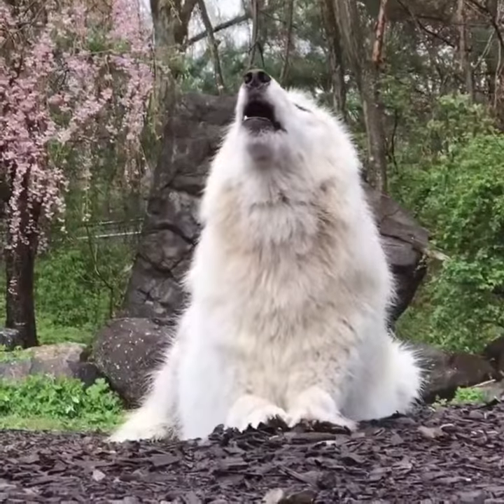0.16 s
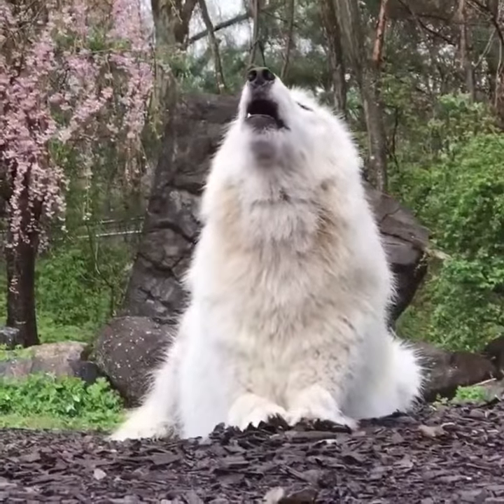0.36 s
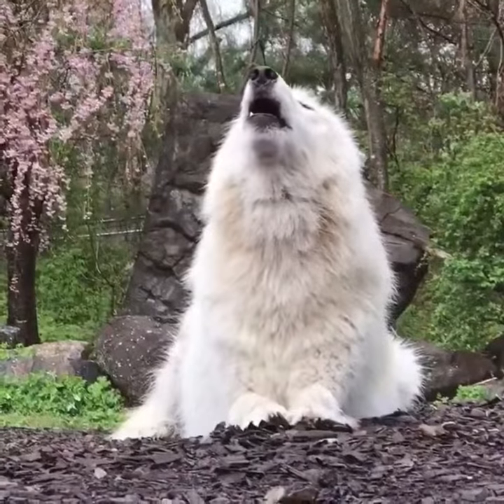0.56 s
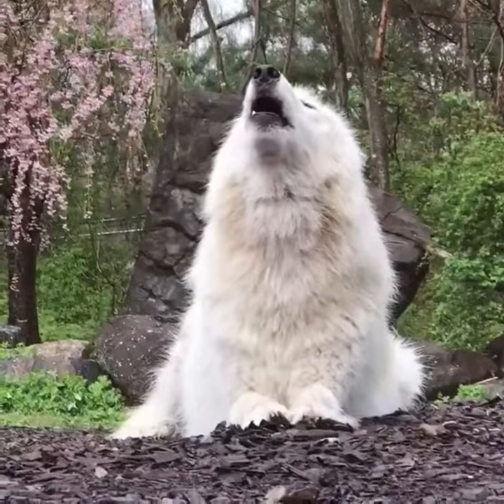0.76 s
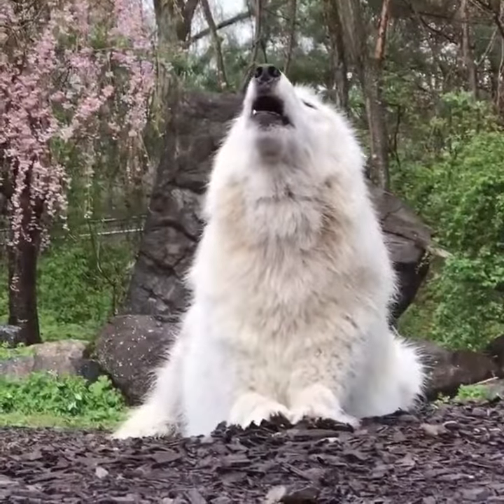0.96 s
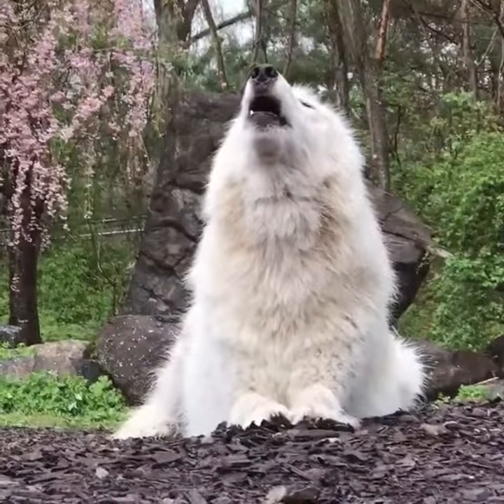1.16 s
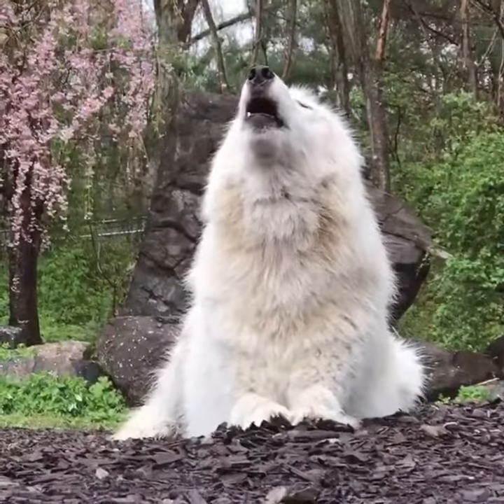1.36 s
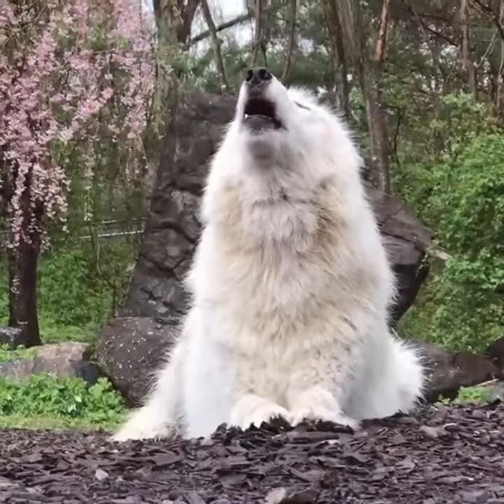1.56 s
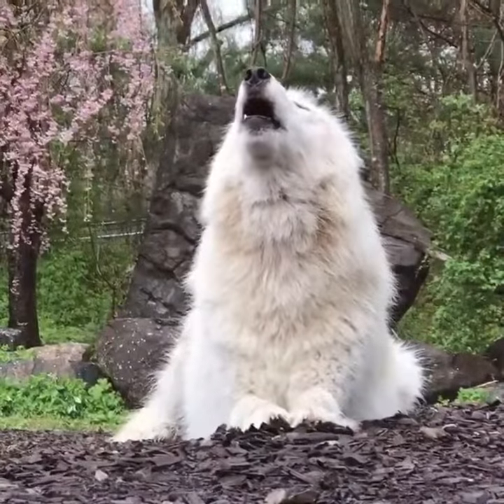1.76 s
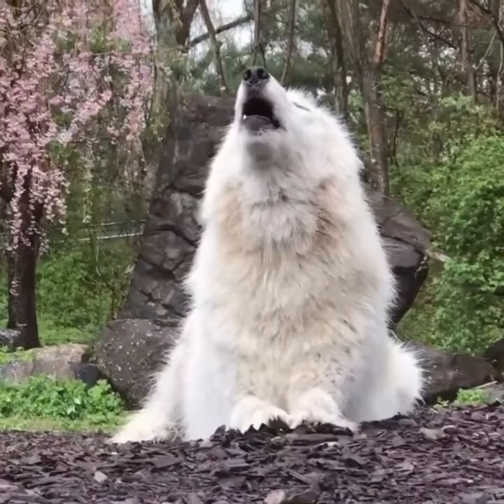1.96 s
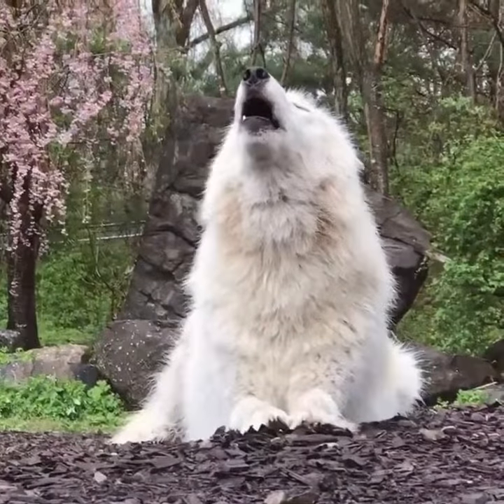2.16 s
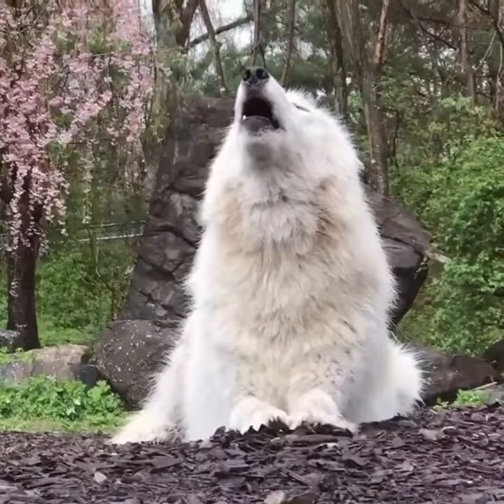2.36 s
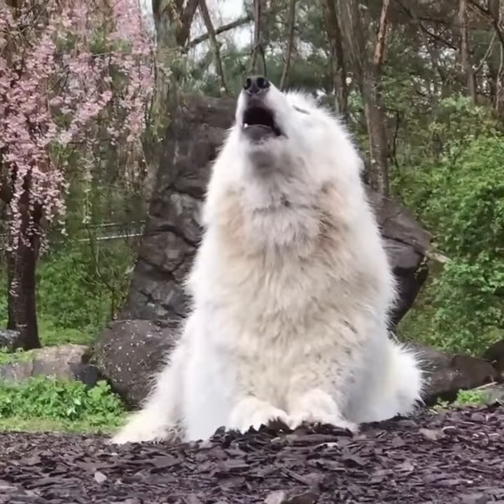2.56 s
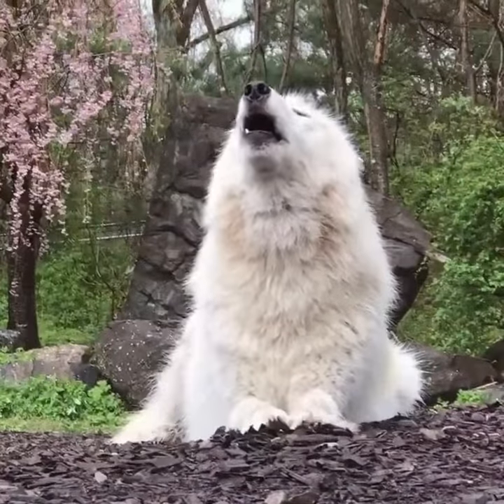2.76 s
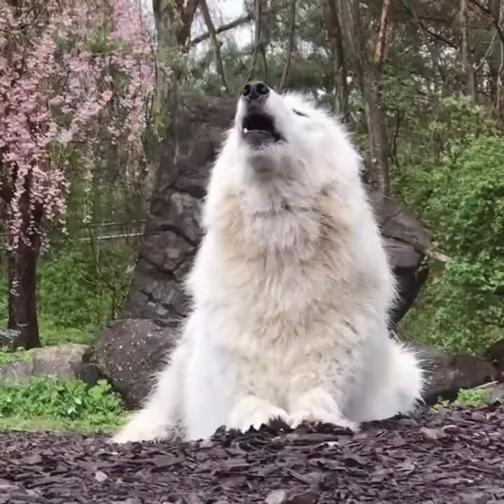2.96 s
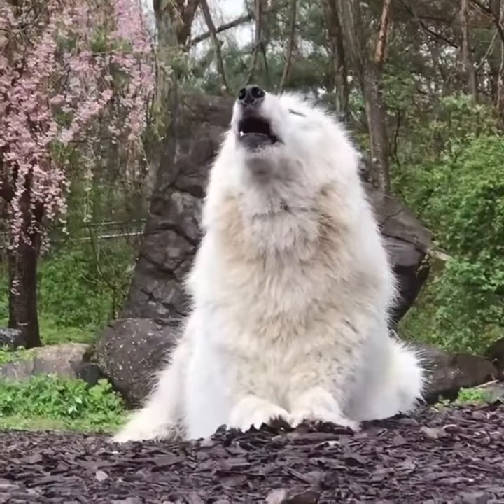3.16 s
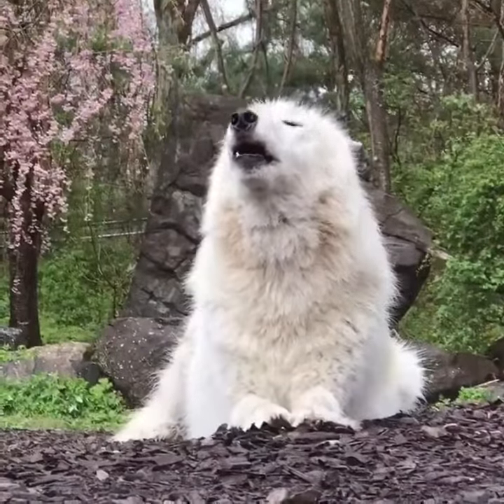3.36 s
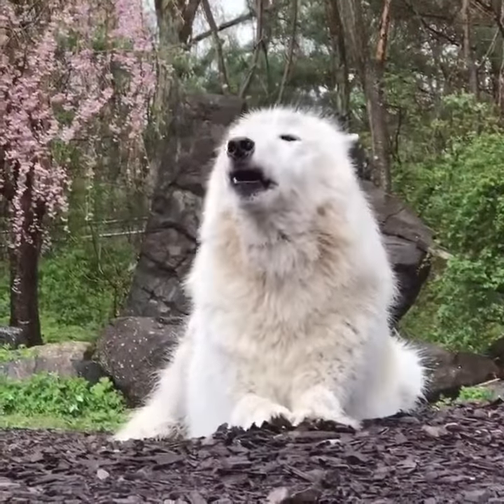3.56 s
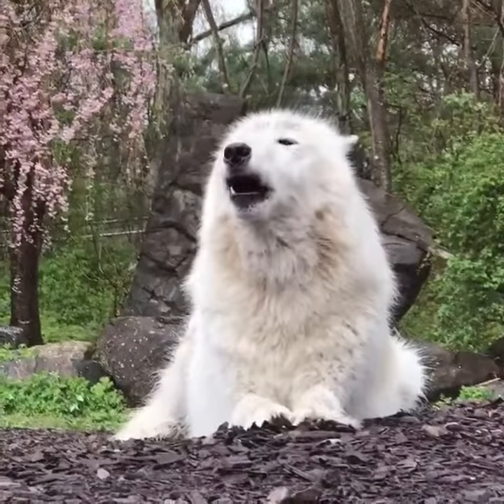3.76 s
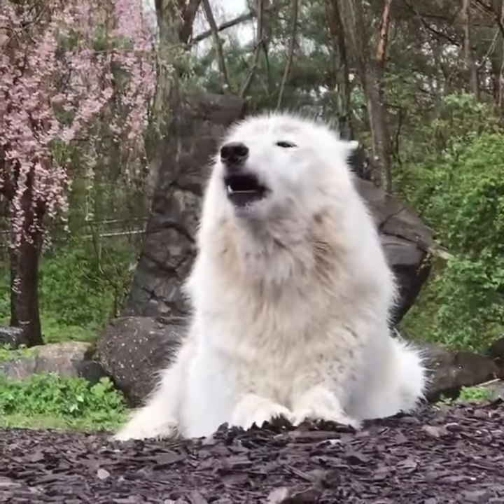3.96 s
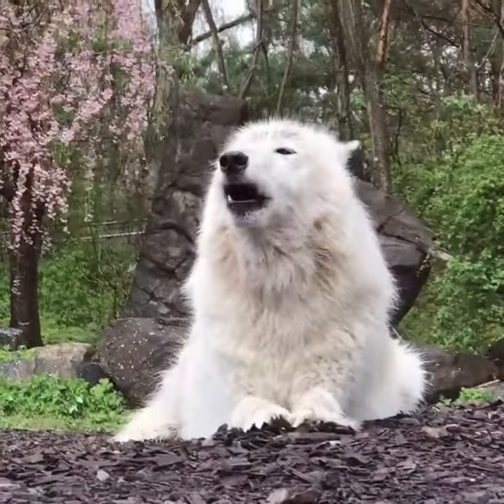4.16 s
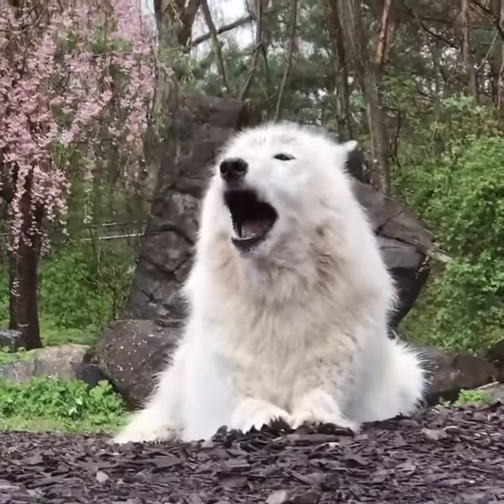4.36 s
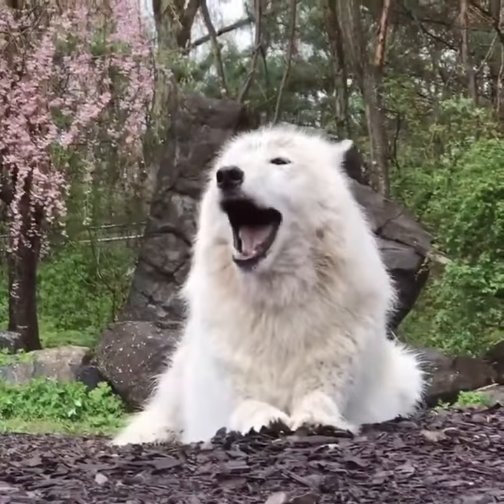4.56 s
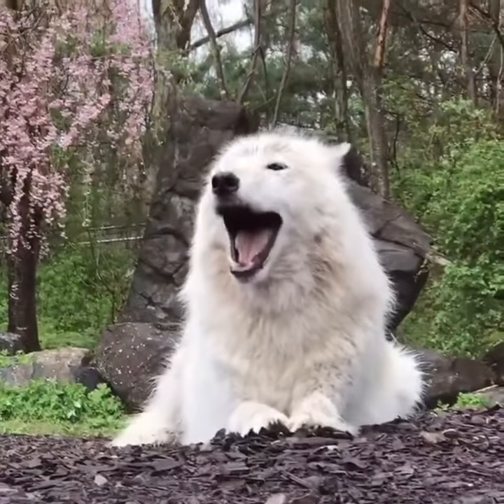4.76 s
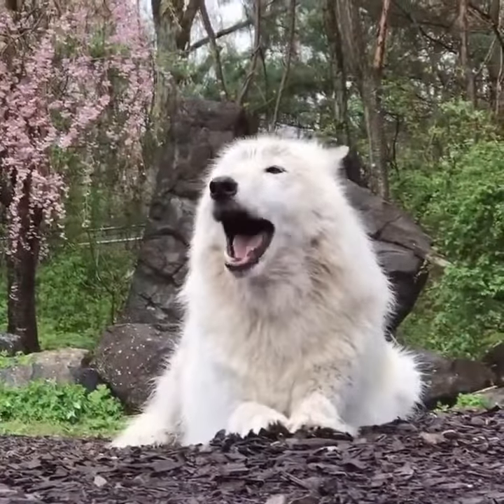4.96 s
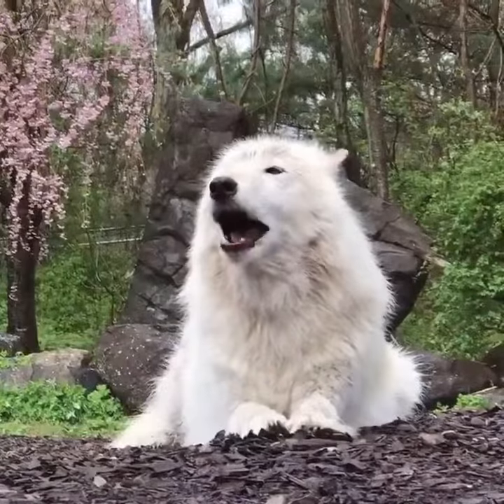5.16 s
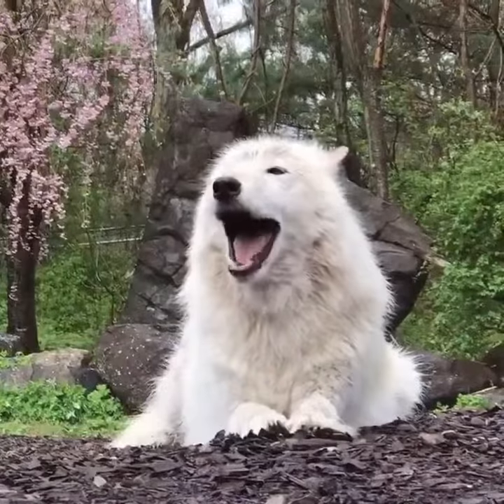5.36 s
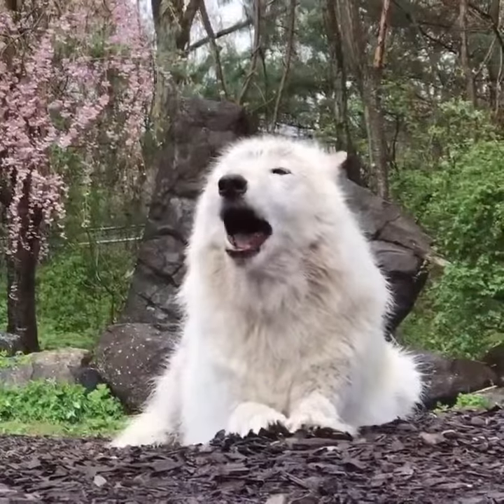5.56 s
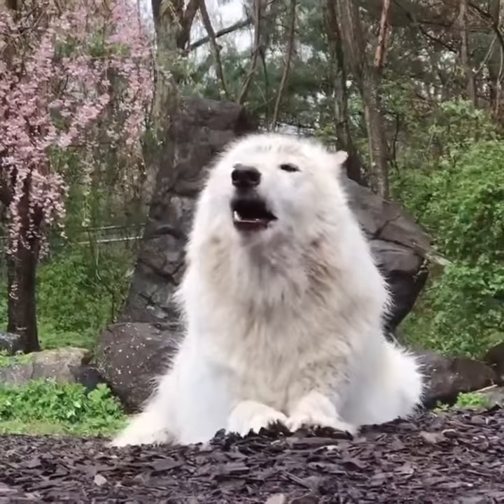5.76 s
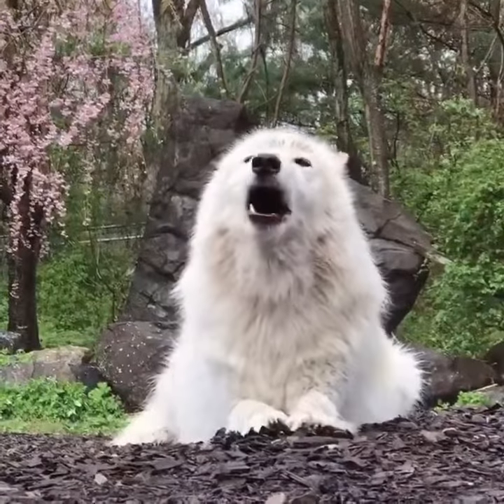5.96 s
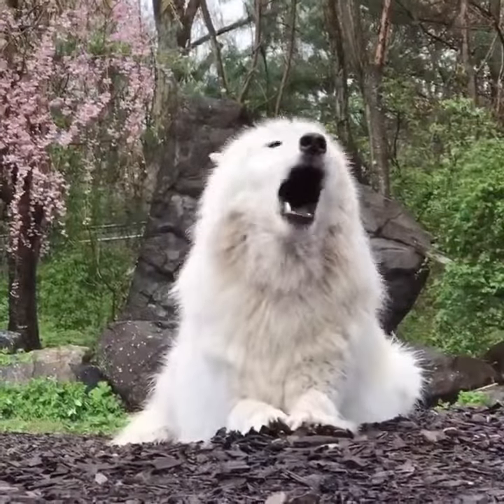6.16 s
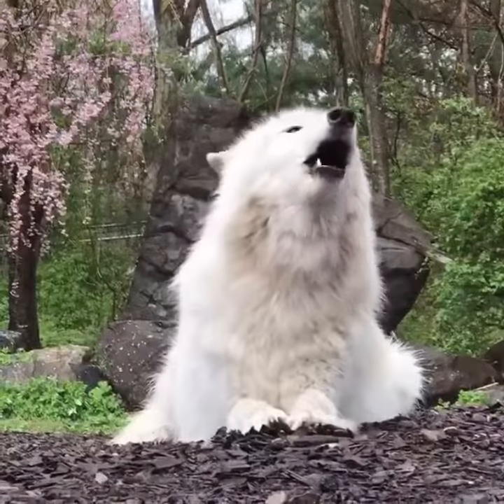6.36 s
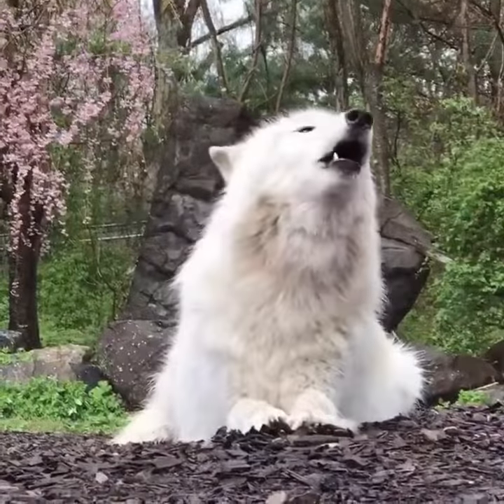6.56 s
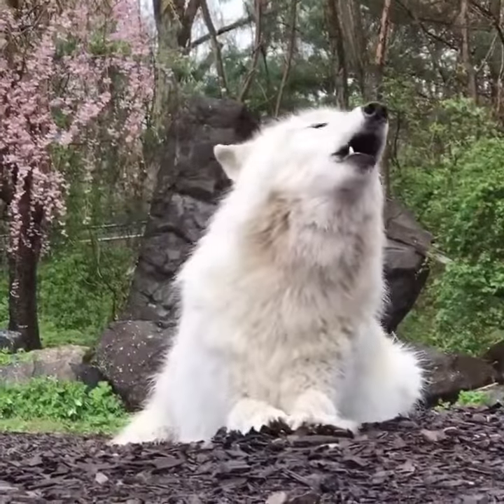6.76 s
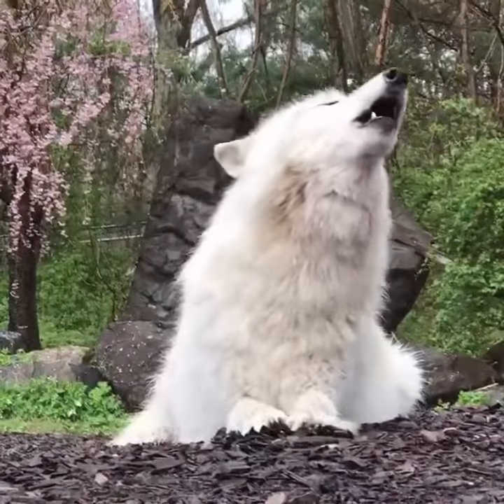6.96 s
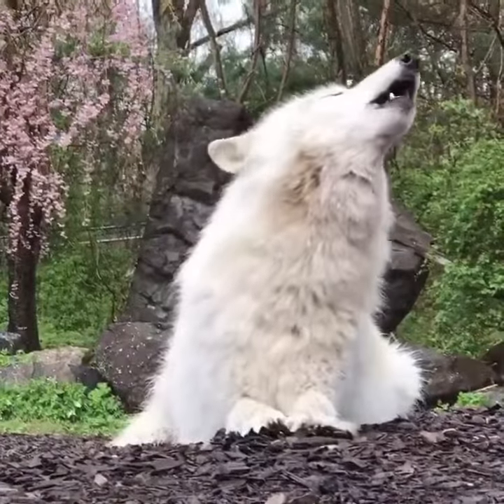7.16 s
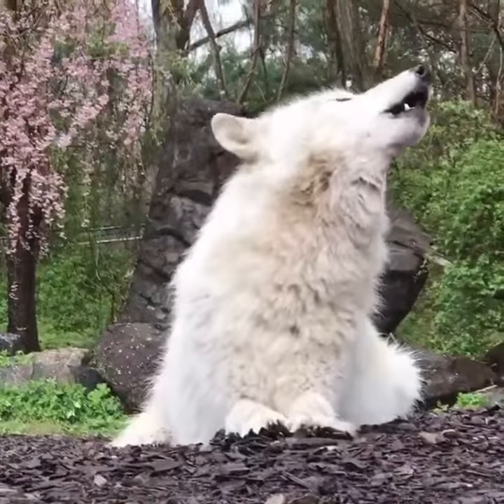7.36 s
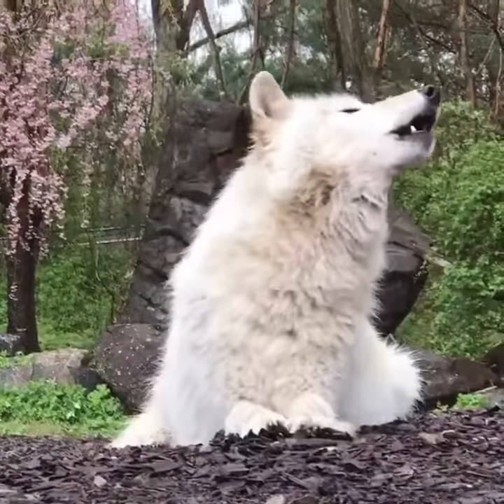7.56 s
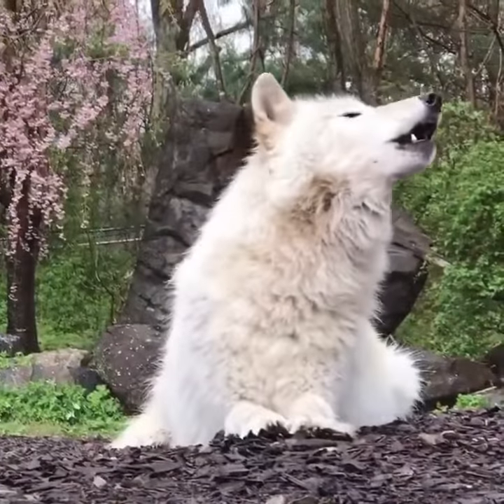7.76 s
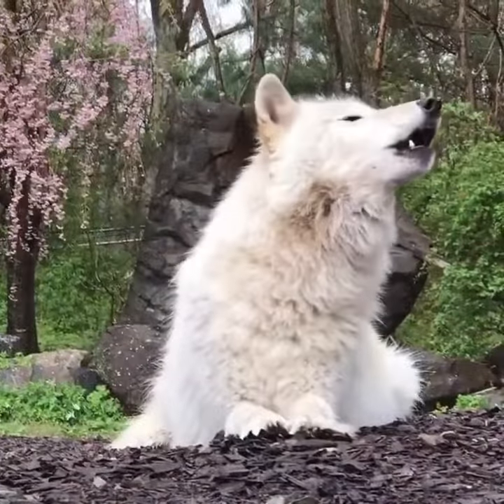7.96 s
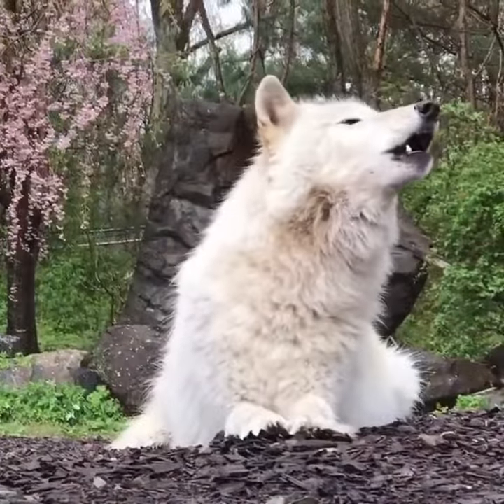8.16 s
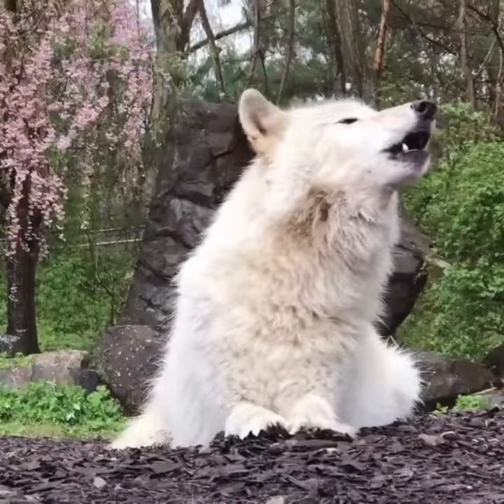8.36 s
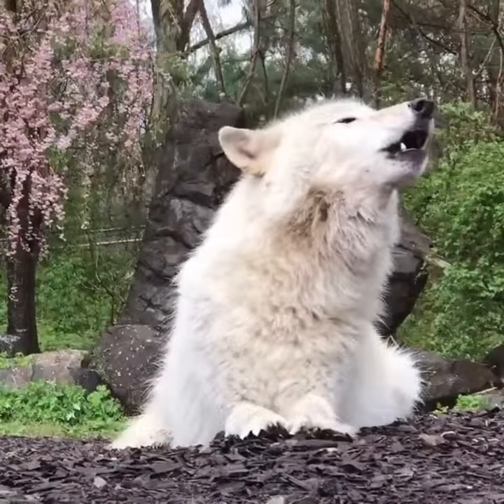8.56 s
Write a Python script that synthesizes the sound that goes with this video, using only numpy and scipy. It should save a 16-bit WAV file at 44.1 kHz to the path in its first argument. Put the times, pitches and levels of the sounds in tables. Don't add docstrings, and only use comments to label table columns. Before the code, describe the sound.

Close to a small microphone in quiet woods, a wolf holds a long mid-pitched howl while a packmate holds a higher, purer note. The near voice sags, cracks into a brief yodel, pauses, then whines and wails as the mate slides downward. A rough growl snaps into a bark, and after a short gap it scoops up to a softer, steady high howl with faint distant calls.

```python
import sys
import numpy as np
from scipy import signal
from scipy.fft import rfft, irfft, next_fast_len
from scipy.io import wavfile
from scipy.ndimage import uniform_filter1d, minimum_filter1d, map_coordinates

SR = 44100
rng = np.random.default_rng(int(sys.argv[2]) if len(sys.argv) > 2 else 0)


def log_audio(samples):
    frames = np.atleast_2d(samples).T
    limited = np.clip(frames, -1, 1)
    pcm = np.round(limited * 32767).astype(np.int16)
    wavfile.write(sys.argv[1], SR, pcm)


def amplitude_ratio(level_db):
    exponent = np.asarray(level_db, float) / 20
    return 10 ** exponent


N = 379260

# pitch_hz, level_db
HUSH_COLOUR = [(25, -28.5), (50, -26.5), (80, -6), (125, 2), (300, -7), (700, 5), (1500, -14.5),
               (2400, -23), (2900, -31), (6000, -35.5), (11500, -40.5)]
# start_s, level_db
HUSH_LEVEL = [(0, -57.5), (2.5, -59.5), (3, -55), (4, -59.5), (4.4, -56), (6.2, -56.5), (6.6, -64),
              (7.7, -62.5), (8.6, -58.5)]
# pitch_hz, t60_s
TREE_DECAY = [(200, 1.2), (1000, 1.5), (1800, 1.6), (3500, 0.3)]

# start_s,
# pitch_hz, level_db
MATE_NOTE = [(0.0, 699, -13.5), (1.0, 699.6, -14.5), (1.5, 687, -14), (2.18, 674.2, -13.5),
             (3.24, 678, -12.5), (3.8, 671.6, -14),
             (3.94, 651.7, -21), (4.061, 609.6, -22.5), (4.2, 590, -22.5), (4.32, 544.7, -23),
             (4.62, 535, -22.5), (4.819, 491.3, -28.5), (4.96, 464.4, -28.5), (5.12, 459, -30),
             (5.3, 462.9, -32),
             (5.38, 447, -25.5), (5.44, 425.1, -27), (5.5, 409.5, -27.5), (5.6, 365.8, -20.5),
            (5.78, 355.7, -26.5), (6.06, 358, -21.5), (6.14, 354.2, -23), (6.18, 339.2, -30),
            (6.21, 331, -29)]
MATE_END = [(6.54, 339, -50.5), (6.74, 323.5, -48.5), (6.9, 312, -54), (6.99, 300, -53.5)]
# start_s, pitch_hz, level_db
FAR_CALLS = [
    [(4.2, 470.8, -32.5), (4.3, 462, -42.5), (4.42, 436, -33.5), (4.62, 416.5, -28.5), (4.8, 404, -29.5),
     (5.3, 394, -38), (5.75, 399.8, -37), (5.96, 397, -30.5), (6.21, 382, -35)],
    [(7.2, 658, -62.5), (7.58, 648, -61.5), (7.98, 645, -58), (8.36, 651, -52), (8.6, 628.5, -61.5)],
    [(8.15, 507, -63.5), (8.22, 486, -50), (8.3, 426, -48.5), (8.42, 417, -59.5)],
    [(.36, 569, -47.5), (.54, 545, -48)],
    [(1.18, 578, -49.5), (1.4, 582, -46.5), (1.58, 593, -47)],
    [(1.95, 521, -44.5), (2.22, 574, -45.5)],
    [(.1, 219.6, -58.5), (1.6, 224.6, -64), (3.4, 204.3, -59)],
]
FAR_SECOND_DB = [4.5, 37, -5, -10.5, -11.5, -7.5, -16]
# partial_hz, level_db
OVERTONE = [(620, -13.5), (720, -18.5), (830, -24), (890, -33), (940, -16.5), (1090, -11), (1330, -28.5),
            (1400, -37.5)]

# middle_s, length_s, pitch_hz, level_db
SQUEAKS = [
    (4.393, 0.074, 2000, -61.5),
    (4.37, .04, 9300, -72),
    (6.1, .03, 2350, -57.5),
    (7.6, .03, 6200, -60),
    (5.753, 0.024, 2700, -52),
    (5.772, 0.037, 2460, -44),
    (6.219, .034, 501.6, -15.5),
    (6.227, .024, 1310, -23),
]
# start_s, level_db
PUFFS = [
    (6.222, -37.5),
    (6.365, -39.5),
    (6.995, -35.5),
]
# start_s, slap_rate_hz, level_db
GROWLS = [
    [(6.207, 491, -25.5), (6.222, 476.5, -14.5), (6.24, 378.4, -11), (6.3, 309, -10), (6.375, 350.3, -11),
     (6.405, 369, -24.5)],
    [(3.928, 431, -24), (3.942, 419.3, -21), (3.955, 419.4, -24)],
    [(5.715, 456, -25), (5.735, 402.3, -25), (5.765, 326, -40.5)],
    [(7.088, 458.4, -25.5), (7.098, 458, -16), (7.11, 447, -29.5), (7.2, 590, -52)],
]
# pitch_hz, width_hz, level_db
JAW = [(325, 150, -8), (535, 58, 4.5), (845, 59, -1), (1290, 270, -4.5), (1480, 260, -6.5),
       (1940, 180, -20.5)]
# pitch_hz, level_db
RASP = [(2500, -40), (2850, -31), (3300, 0.5), (3900, -14.5), (4400, -12), (5200, -5), (5900, -13),
        (6500, -10.5), (8000, -17), (11800, -30), (12300, -80)]
STUTTER_HZ, STUTTER_DB = 84.5, 3

# start_s, pitch_hz, effort_db, tilt_db_per_octave, mouth_wider_percent
LONG_NOTE = [(0.0, 408.6, -10.5, -9.5, 3), (0.22, 397.1, -10.5, -10, 0.66), (0.46, 389.6, -13.5, -9.5, -0.6),
             (1.02, 393.1, -11.5, -9.5, -0.5), (1.08, 403, -11.5, -8, 0.5), (1.52, 393.1, -12, -9.5, 0),
             (1.64, 403.4, -13, -7, 0.9), (1.73, 397.5, -12.5, -8.5, 1), (1.86, 403.8, -14, -8.5, -1.5),
             (2.149, 407.1, -12.5, -9, -0.9), (2.47, 411, -12.5, -9, 1), (2.72, 396.9, -12, -9, 0.5),
       (2.82, 386.7, -14.5, -9, 0.7), (3.239, 381.2, -14.5, -6.5, 1.5), (3.42, 375.8, -14.5, -6, 4),
       (3.498, 364.7, -16, -4, 0.4), (3.7, 349.6, -17.5, -5.5, -1.5), (3.8, 371.3, -15.5, -5.5, 5),
             (3.88, 360, -15.5, -7, 2.5), (3.901, 386.8, -13.5, -5.5, 9.5), (3.92, 414.6, -13, -5.5, 3.5),
        (3.935, 412.4, -18.5, -6.5, -8.5), (3.948, 417, -32, 2.5, -2)]
YODEL = [(3.936, 600.4, -33, -23.5, -10.5), (3.958, 713.7, -17.5, -31, -4.5), (3.97, 693, -29, -26, -1),
         (3.982, 566, -26, -26.5, -10), (4.0, 455.5, -16, -19.5, -10.5), (4.03, 431, -15.5, -22.5, -7.5),
         (4.08, 414.2, -25.5, -19, -9.5), (4.1, 412, -25, -30, -10), (4.13, 381, -63.5, -16.5, -10.5)]
WHINE_TO_WAIL = [(4.458, 407.5, -22.5, -21, -14.5), (4.5, 418.9, -11.5, -17, -12.5),
                 (4.56, 410.1, -13, -14.5, -15.5), (4.635, 523.1, -12.5, -13.5, -0.5), (4.72, 501, -9.5, -15, -0.5),
                 (4.76, 524.7, -10, -14.5, 2.5), (4.81, 514.8, -22.5, -9, -4.5), (4.86, 580, -17, -11, 7),
                 (4.94, 523.4, -22.5, -7.5, -3),
                 (4.991, 519, -22, -8, -3.5), (5.1, 542.8, -21, -7.5, 0), (5.15, 583.7, -17, -10.5, 7.5),
        (5.34, 533.5, -2.5, -18.5, 1.55), (5.51, 558, -20.5, -8, 3.5), (5.55, 538.8, -18, -10.5, 0.9),
        (5.63, 431.6, -10, -14, -12.5), (5.71, 460.7, -10.5, -15.0, -8.5), (5.762, 530, -40.5, -15, 5)]
BARK = [(6.23, 357.8, -28, -24, -0.5), (6.31, 297.2, -25.5, -23, -4), (6.36, 323, -26, -5, -0.2),
        (6.39, 380.7, -27, -2, -5.5), (6.42, 420, -24.5, 0.5, -5), (6.45, 431, -24, -0.5, -3),
        (6.49, 410.3, -22, -2, -3.5), (6.515, 403.2, -25, -4.5, -5), (6.545, 393, -50, -18.5, 0)]
SCOOP = [(6.984, 306.3, -29, -15, -11.5), (7.0, 309.2, -22, -19.5, 0.5), (7.011, 368.4, -15, -20.5, 19.5),
         (7.02, 381, -14, -24, -9), (7.06, 400.8, -13.5, -24.5, 7.5), (7.088, 426, -15, -22.5, 21.5),
         (7.105, 428, -22, -22, 15)]
HIGH = [(7.096, 588.8, -43, -15.5, 1), (7.125, 643.6, -42.5, -18, 1), (7.155, 663.7, -45.5, -18.5, -3.5),
        (7.2, 678.6, -45.5, -19.5, -10), (7.315, 688.2, -47.5, -14.5, -8.5),
        (7.465, 676.3, -46.5, -15.5, -10.5), (7.865, 691.5, -48, -18, 3), (8.355, 704.4, -47.5, -11.5, 3.5),
        (8.6, 695.4, -48, -9.5, 0.8)]
# pitch_hz, half_width_hz, level_db
HELD_MOUTH = [(727, 31, 2.5), (1094.5, 48, -20.5), (1240, 220, 8), (1567, 42, 11), (1619.7, 38.5, -30),
              (1869.5, 87.5, -38), (2190, 18, -33)]
YODEL_MOUTH = [(914, 23, 18.8), (1334, 233, 30.7), (1870, 140, 32.4), (2415.0, 200, 23)]
WHINE_MOUTH = [(500, 22.4, -18), (986.4, 19.5, 9.5), (1094.1, 20, 18.5), (1576, 180, 19.5),
               (2120, 57, 10.5), (2395, 50, 13.5), (2660, 60, -14)]
BARK_MOUTH = [(830, 110, 15), (1378, 32.0, 15.5), (1705, 58, 10), (2170, 56, -43.5)]
SCOOP_MOUTH = [(630, 90.7, 21.8), (805, 16, 4.1), (1190, 180, 31.2), (1630, 89, 20.2)]
HIGH_MOUTH = [(764, 356, 35.46), (1360, 246, 27.25), (2060, 35, 14), (2460, 150, 24.9)]
# pitch_hz, level_db
SHUT = [(1500, -44), (2180, 6.5), (2340, -25), (2460, -1.5), (3000, -32.5), (4400, -12), (4800, -24),
        (6000, -6.5), (6500, -7.5), (7400, -32.5), (8400, -21.5), (9000, -28.5), (11800, -42),
        (12300, -92.5)]
OPEN = [(1500, -93), (2300, -1.5), (3600, -2.5), (4700, -20), (5600, -16), (6600, -14.5), (8200, -36),
        (9400, -17), (10200, -40), (11000, -28.5), (11800, -38.5), (12300, -92)]
NARROW = [(1500, -87), (2400, -0.5), (3200, -14), (4100, -11.5), (4800, -16), (5500, -7), (6100, -25.5),
          (7100, -9), (8000, -30), (9300, -24.5), (11600, -41), (12300, -89.5)]
GAPE = [(1500, -60), (2400, -3), (2750, -22), (3200, 0), (3800, -16), (4400, -14), (5050, 0), (5600, -14),
        (6300, -6), (7400, -10), (8400, -22), (9600, -12), (11600, -35), (12300, -90)]
SNAP = [(1500, -60), (2500, -6), (2950, 0), (3400, -2), (3800, -20), (4250, 0), (4650, -8), (5000, -1),
        (5500, -16), (6000, -4), (7000, -12), (9300, -20), (11600, -40), (12300, -90)]
# start_s, pitch_hz, lift_db
PALATE = [(0, 4300, 5.5), (1.0, 4240, 5.5), (1.65, 4190, 5), (2.0, 4410, 5.5), (2.7, 4370, 5.5),
          (3.1, 4200, -2), (3.5, 3730, 10.5), (3.62, 3920, 14), (3.85, 4020, 13), (3.96, 3370, 7),
          (4.06, 3200, 7.5), (4.5, 3360, 6.5), (4.72, 3576, 12), (4.95, 3610, 9), (5.2, 3390, 8.5),
          (5.5, 3360, 8.5), (5.64, 3440, 9.5), (6.4, 3260, 4.5), (6.48, 4240, 15), (7.04, 3700, 5.5),
          (7.15, 4010, 9.5), (7.6, 4100, 6.5), (8.6, 4180, 1.5)]
THROAT = [(0, 5330, 5.8), (.7, 5500, 6), (1.2, 5200, 6), (1.7, 5580, 6), (2.2, 5260, 8), (2.7, 5200, 2.7),
          (3.4, 5060, 3.9), (3.62, 5720, 8.9), (3.85, 5500, 3.6), (3.98, 5050, 10), (4.08, 5100, 5),
          (4.5, 5400, 7), (4.76, 5150, 6), (5.05, 6000, 8), (5.2, 5690, 10), (5.36, 5340, 10),
          (5.52, 5540, 7.2), (6.4, 5120, 4.5), (6.49, 4950, 8), (7.05, 5250, 8.1), (7.14, 5310, 11),
          (7.6, 5420, 8), (8.1, 5520, 5), (8.6, 4900, 4)]
NOSE = [(0, 6200, 8), (.6, 6250, 4.5), (1.1, 5990, 8.5), (1.45, 6220, 5.5), (1.9, 6000, 9.5),
        (2.4, 6190, 1.5), (2.72, 6140, 10), (2.85, 6200, 14), (3.3, 5990, 17.5), (3.5, 6270, 10.5),
        (3.77, 6540, 5), (4.03, 6250, 2.5), (4.5, 6500, 2), (4.72, 6600, 3.5), (4.95, 6280, 5),
        (5.3, 6550, 5), (5.55, 6600, 8.5), (6.45, 5970, 5.5), (7.04, 6400, 6.5), (7.5, 6730, -1.5),
        (8.0, 7070, 2), (8.4, 6760, 8.5), (8.6, 6700, 11)]
SINUS = [(0, 8730, 0.5), (.6, 8700, 10), (1.0, 8570, 2), (2.7, 8660, 0.5), (2.9, 8500, 11.5),
         (3.4, 8270, 14), (3.55, 8330, 5), (3.9, 8510, 3.5), (4.1, 8506, 1), (8.6, 8520, 0.5)]
# start_s, pitch_hz, lift_db
HOLLOW = [(0, 4850, -5), (1.9, 4900, -9), (2.6, 4800, -4), (3.1, 7100, -12), (3.45, 7300, -12),
          (3.9, 6200, -8), (4.05, 4000, -6), (4.6, 4500, -14), (4.95, 5300, -9), (5.2, 4300, -6),
          (5.36, 3900, -10), (5.65, 4400, -6), (6.46, 3800, -10), (7.05, 4500, -10), (7.5, 6300, -8),
          (8.6, 7800, -10)]
WANDER_WIDTH_HZ = 110
PURSE_S, PURSE_WIDTH_S = 5.36, 0.16
TURN_S, TURN_WIDTH_S, TURN_DB = 3.5, 0.56, -13.5

# start_s, level_db
TICKS = [(0.2214, -59.5), (0.2309, -52.5), (0.2738, -54), (0.3885, -60.5), (0.5212, -52), (0.5442, -55.5),
         (0.6774, -56), (0.7262, -55.5), (0.8131, -58), (0.8744, -51.5), (0.8894, -62.5), (0.9228, -52.5),
         (0.9712, -50), (1.0625, -56.5), (1.1794, -58), (1.1972, -52), (1.3274, -60.5), (1.3548, -56),
         (1.3927, -55), (1.4611, -50.5), (1.5399, -48.5), (1.5883, -49.5), (1.6057, -48.5), (1.705, -58),
         (1.7225, -56), (1.7504, -54.5), (1.7679, -51.5), (1.934, -56.5), (2.0203, -55.5), (2.0677, -61),
         (2.3251, -57), (2.6264, -53), (2.6668, -54.5), (2.6923, -56), (2.9741, -55.5), (3.0495, -54.5),
         (3.0834, -58.5), (3.1173, -55.5), (3.2455, -57), (3.2819, -59), (3.3323, -59), (3.3852, -59.5),
         (3.4705, -57.5), (3.487, -51.5), (3.7534, -50.5), (3.918, -47), (6.3679, -40), (7.008, -51.5),
         (7.1048, -48), (7.1264, -48), (7.1334, -51), (7.1886, -53.5), (7.1984, -56)]


def unit(x):
    return x / np.sqrt(np.mean(x ** 2) + 1e-20)


def along(points, hz):
    f, v = np.transpose(points)
    return np.interp(np.log(hz + 1), np.log(f + 1), v)


def wobble(n, rate):
    knots = rng.standard_normal(int(n * rate / SR) + 4)
    return map_coordinates(knots, [np.arange(n) * rate / SR])


def filtered(x, response):
    m = next_fast_len(len(x) + SR // 2)
    return irfft(rfft(x, m) * response(np.fft.rfftfreq(m, 1 / SR)), m)[:len(x)]


def patchy(n, depth_db):
    z = signal.stft(rng.standard_normal(n + 1024), nperseg=512)[2]
    field = uniform_filter1d(rng.standard_normal(z.shape), size=5, axis=0)
    field = uniform_filter1d(field, size=12, axis=1)
    return signal.istft(z * amplitude_ratio(depth_db * unit(field)), nperseg=512)[1][:n]


def call(rows, fade=0.009):
    s, *cols = np.transpose(rows)
    first = max(round(s[0] * SR), 0)
    t = np.arange(first, min(round(s[-1] * SR), N)) / SR
    edge = np.minimum(t - s[0], s[-1] - t) / fade
    edge += (s[0] < fade) * (t < fade) + (t > N / SR - fade)
    return first, np.clip(edge, 0, 1), [np.interp(t, s, c) for c in cols]


def hush(voice, duck_db=-6):
    air = unit(filtered(rng.standard_normal(N), lambda f: amplitude_ratio(along(HUSH_COLOUR, f))))
    rumble = filtered(air, lambda f: 1 / (1 + (f / 190) ** 6))
    hiss = filtered(air, lambda f: 1 / (1 + (1500 / (f + 1)) ** 8))
    loud = unit(np.sqrt(np.abs(uniform_filter1d(voice ** 2, size=40000))))
    swell_db = 0.79 * wobble(N, 4.5)
    level_db = call(HUSH_LEVEL)[2][0] + 13.0 + swell_db
    leaves = air - rumble - hiss + amplitude_ratio(2.5 - 3 * loud) * hiss
    return amplitude_ratio(level_db) * leaves + amplitude_ratio(-41.5 + duck_db * loud + swell_db) * rumble


def trees(x):
    hz, t, z = signal.stft(rng.standard_normal(SR), SR, nperseg=256)
    decay = amplitude_ratio(-60 * t / along(TREE_DECAY, hz)[:, None])
    tail = signal.istft(z * decay, SR, nperseg=256)[1]
    return signal.fftconvolve(np.pad(x, (600, 0)), tail / np.linalg.norm(tail))[:N]


def mate(rows, second_db, third_db):
    first, edge, (hz, db) = call(rows, fade=0.038)
    n = len(hz)
    phase = 2 * np.pi * np.cumsum(hz) / SR + 0.03 * wobble(n, 86)
    second = amplitude_ratio(second_db + along(OVERTONE, 2 * hz))
    third = amplitude_ratio(third_db - 0.092 * (hz - 359.0))
    tone = np.sin(phase) + second * (np.sin(2 * phase) + third * np.sin(3 * phase))
    out = np.zeros(N)
    out[first:first + n] = edge * np.sqrt(2) * tone * amplitude_ratio(db + 0.31 * wobble(n, 30))
    return out


def squeaks():
    out = np.zeros(N)
    for s, length, hz, db in SQUEAKS:
        n = round(length * SR)
        phase = 2 * np.pi * hz * np.arange(n) / SR + hz * length / 120 * wobble(n, 150)
        start = round((s - length / 2) * SR)
        out[start:][:n] += amplitude_ratio(db + 10.0) * np.hanning(n) * np.sin(phase)
    return out


def puffs():
    out = np.zeros(N)
    u = np.arange(SR // 10) / (.007 * SR)
    for s, db in PUFFS:
        out[round(s * SR):][:len(u)] += amplitude_ratio(db) * u * (2 - u) * np.exp(-u)
    return out


def growl(rows):
    first, edge, (hz, db) = call(rows, fade=0.0025)
    n = len(hz)
    cycles = np.cumsum(hz * amplitude_ratio(1.6 * wobble(n, 250))) / SR
    slaps = np.flatnonzero(np.diff(np.floor(cycles)) > 0)
    pulses = np.zeros(n)
    pulses[slaps] = amplitude_ratio(2.5 * rng.standard_normal(len(slaps)))
    stutter = 2 * np.pi * np.cumsum(STUTTER_HZ * amplitude_ratio(1.6 * wobble(n, 37))) / SR
    pulses *= amplitude_ratio(STUTTER_DB * np.cos(stutter))
    gate = signal.lfilter([1], [1, -np.exp(-1 / (0.0021 * SR))], pulses)
    air = gate * rng.standard_normal(n)

    def jaw(f):
        return sum((-1) ** k * amplitude_ratio(g) * 1j * f * w / (c * c - f * f + 1j * f * w)
                   for k, (c, w, g) in enumerate(JAW))

    def steep(f):
        return 1 / (1 + (f / 2200) ** 10) * (1j * f / (1j * f + 250)) ** 3

    voice = unit(filtered(pulses + 0.1 * air, lambda f: jaw(f) * steep(f)))
    rasp = unit(filtered(air, lambda f: amplitude_ratio(along(RASP, f))))
    out = np.zeros(N)
    out[first:first + n] = edge * amplitude_ratio(db) * (voice + amplitude_ratio(-35.0) * rasp)
    return out


def howl(rows, mouth, throat, hoarse, upper_db, upper_octaves, patchy_db):
    first, edge, (hz, effort_db, tilt, wider) = call(rows, fade=.006)
    n = len(hz)
    t = (first + np.arange(n)) / SR

    def mouth_db(k):
        rest_hz = k * hz / (1 + wider / 100)
        return sum(g / (1 + ((rest_hz - c) / w) ** 2) for c, w, g in mouth)

    low_db = [effort_db + tilt * np.log2(k) + mouth_db(k) for k in range(1, 6)]
    upper_db = effort_db + upper_db + upper_octaves * tilt

    hz = uniform_filter1d(hz, size=800)
    slip = uniform_filter1d(np.abs(np.gradient(np.log(hz))) * SR, size=600)
    shake = np.clip(hoarse + 0.0064 * slip, 0, .4)
    phase = 2 * np.pi * np.cumsum(hz) / SR + 2.5 * shake * wobble(n, 180)

    def partial(k):
        return np.sin(k * phase + rng.uniform(0, 2 * np.pi))

    low = sum(amplitude_ratio(db) * partial(k) for k, db in enumerate(low_db, 1))

    purse = np.exp(-((t - PURSE_S) / PURSE_WIDTH_S) ** 2)
    turn_db = TURN_DB * np.exp(-((t - TURN_S) / TURN_WIDTH_S) ** 2)
    tracks = []
    for rows_of_track in (PALATE, THROAT, NOSE, SINUS, HOLLOW):
        s, *cols = np.transpose(rows_of_track)
        tracks.append([np.interp(t, s, c) for c in cols])

    def colour_db(f):
        lift = sum(db / (1 + ((f - c) / (WANDER_WIDTH_HZ * (1 + (db < 0)))) ** 2) for c, db in tracks)
        shape = (1 - purse) * along(throat, f) + purse * along(NARROW, f)
        return lift + shape + turn_db * (f > 2450)

    upper = np.zeros(n)
    for k in range(6, 31):
        flicker_db = patchy_db * wobble(n, 7) + 1.5 * wobble(n, 70)
        upper += amplitude_ratio(colour_db(k * hz) + flicker_db) * partial(k)
    upper /= np.sqrt(np.abs(uniform_filter1d(upper ** 2, size=2048)) + 1e-12)

    turbulence = patchy(n, depth_db=4.5)
    breath = unit(filtered(turbulence, lambda f: amplitude_ratio(0.26 * along(throat, f))))
    leak = (.13 + 2.5 * shake) * amplitude_ratio(1.5 * wobble(n, 12))
    shimmer = 1 + 4.9 * shake * wobble(n, 150)
    top = upper + leak * amplitude_ratio(turn_db / 2) * breath
    out = np.zeros(N)
    out[first:first + n] = edge * (shimmer * np.sqrt(2) * low + amplitude_ratio(upper_db) * top)
    return out


def scene():
    near = howl(LONG_NOTE, HELD_MOUTH, SHUT,
                hoarse=0.0065, upper_db=-25.5, upper_octaves=1.7, patchy_db=3.5)
    near += howl(YODEL, YODEL_MOUTH, GAPE, hoarse=.02, upper_db=-33.5, upper_octaves=.01, patchy_db=4)
    near += howl(WHINE_TO_WAIL, WHINE_MOUTH, OPEN,
                 hoarse=.009, upper_db=0.75, upper_octaves=2.226, patchy_db=2.5)
    near += howl(BARK, BARK_MOUTH, SNAP, hoarse=0.0061, upper_db=-23, upper_octaves=1.4, patchy_db=3)
    near += howl(SCOOP, SCOOP_MOUTH, NARROW, hoarse=0.01, upper_db=-1.7, upper_octaves=1.63, patchy_db=2.5)
    near += howl(HIGH, HIGH_MOUTH, NARROW, hoarse=.003, upper_db=-5.0, upper_octaves=0.37, patchy_db=4.0)
    near += sum(growl(rows) for rows in GROWLS) + squeaks() + puffs()

    pack = mate(MATE_NOTE, second_db=1.0, third_db=-7)
    pack += mate(MATE_END, second_db=-4.0, third_db=-8.0)
    pack += sum(mate(rows, second_db=db, third_db=-24.0) for rows, db in zip(FAR_CALLS, FAR_SECOND_DB))

    echo = amplitude_ratio(-37) * trees(near) + amplitude_ratio(-17) * trees(pack)
    return (near + pack + echo + hush(near + pack))[None]


def low_pass(x):
    return signal.sosfilt(signal.butter(12, 12100, fs=SR, output="sos"), x)


def record(dry, top=0.76):
    need = np.minimum(1, top / np.abs(dry + 1e-9))
    held = dry * uniform_filter1d(minimum_filter1d(need, size=441), size=221)
    ticks = amplitude_ratio(-33.5) * (rng.random(N) < 32 / SR) * (np.arange(N) < 3.9 * SR)
    s, db = np.transpose(TICKS)
    ticks[np.round((s + .0015) * SR).astype(int)] = amplitude_ratio(db + 29)
    bent = held + 0.0037 * held ** 2 - 0.002 * held ** 3
    mix = bent + filtered(ticks, lambda f: 1 / (1 + (f / 4600) ** 4))
    return low_pass(mix)


dry = scene()
out = record(dry)
log_audio(out)
```